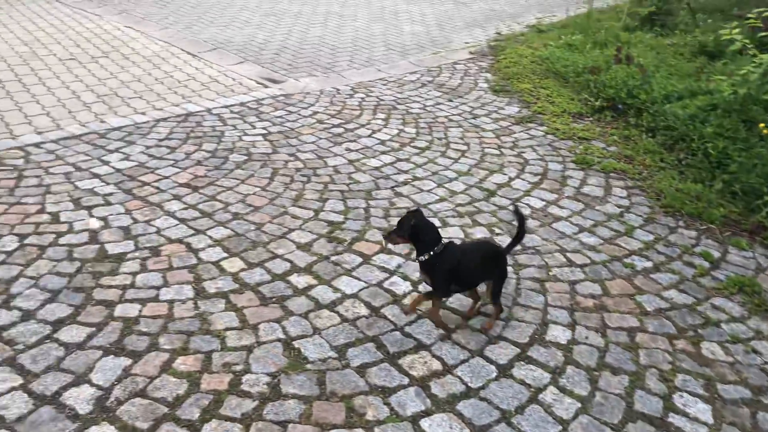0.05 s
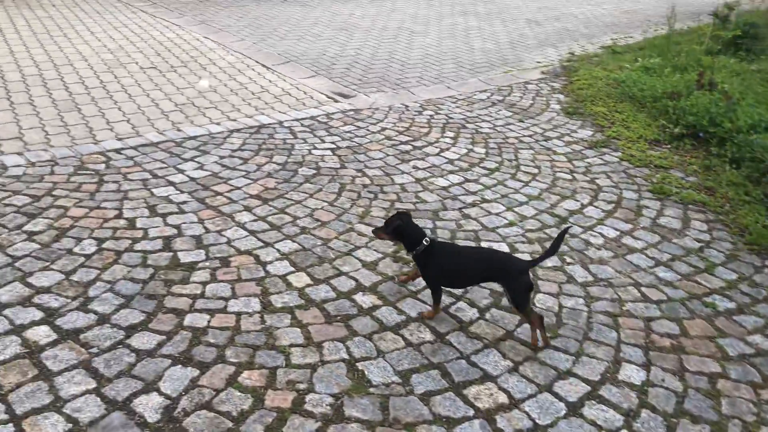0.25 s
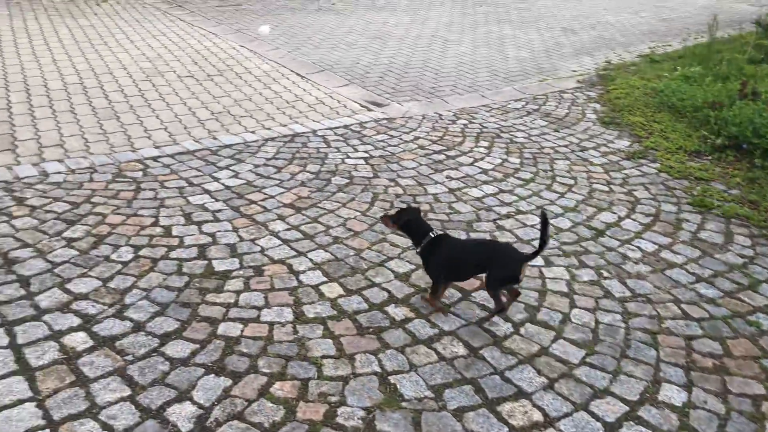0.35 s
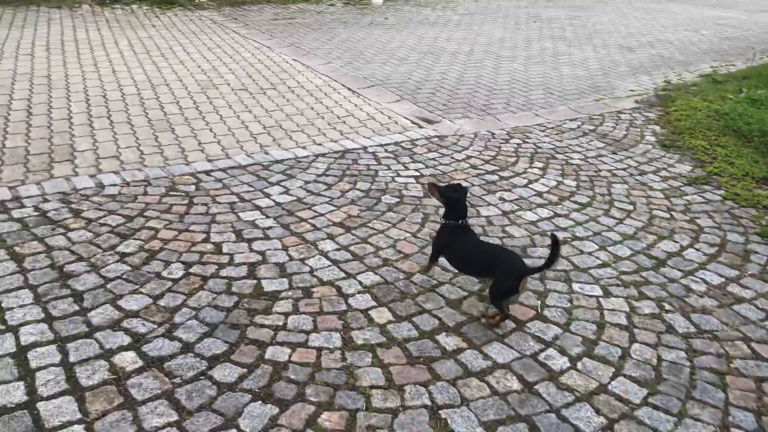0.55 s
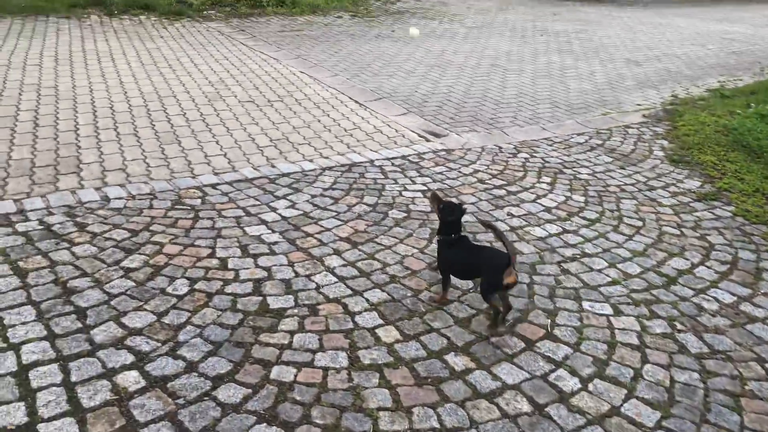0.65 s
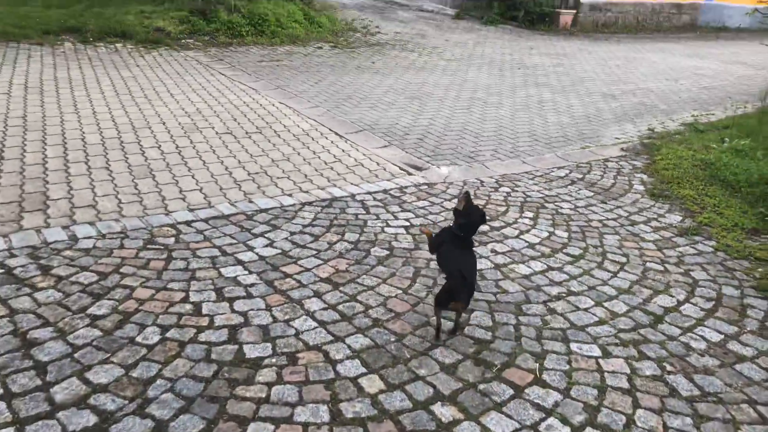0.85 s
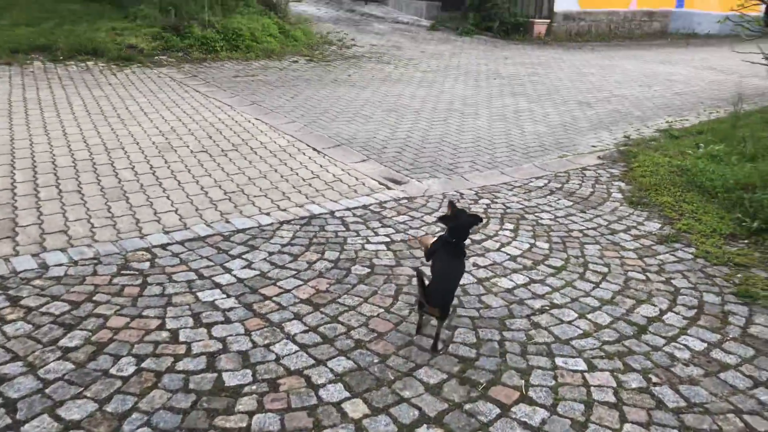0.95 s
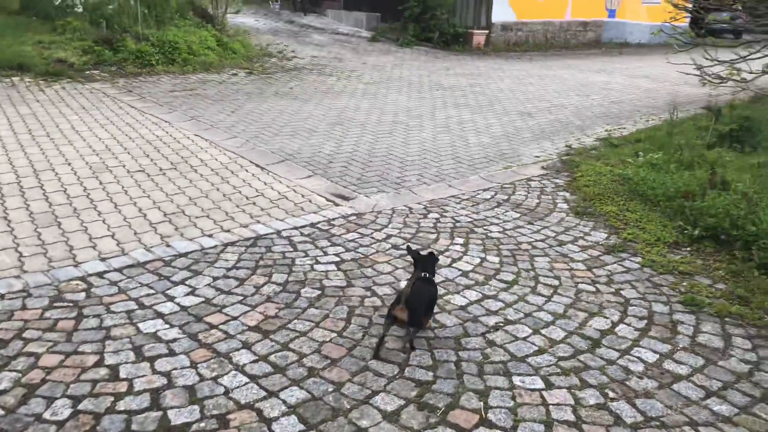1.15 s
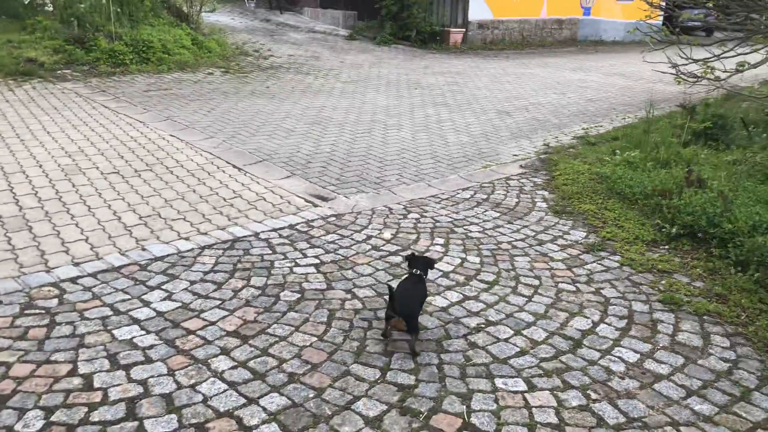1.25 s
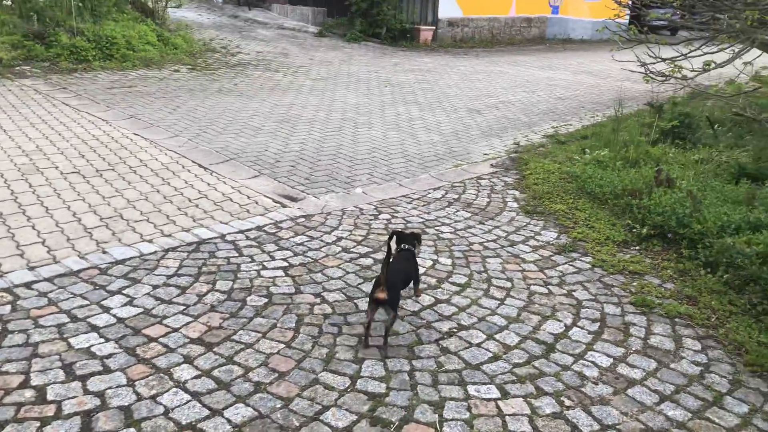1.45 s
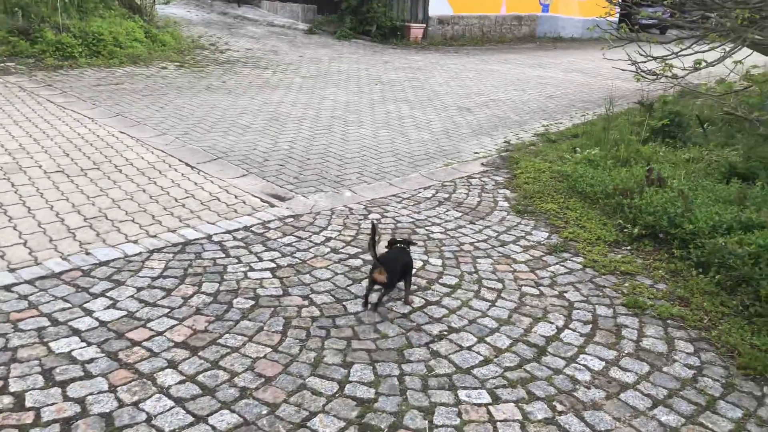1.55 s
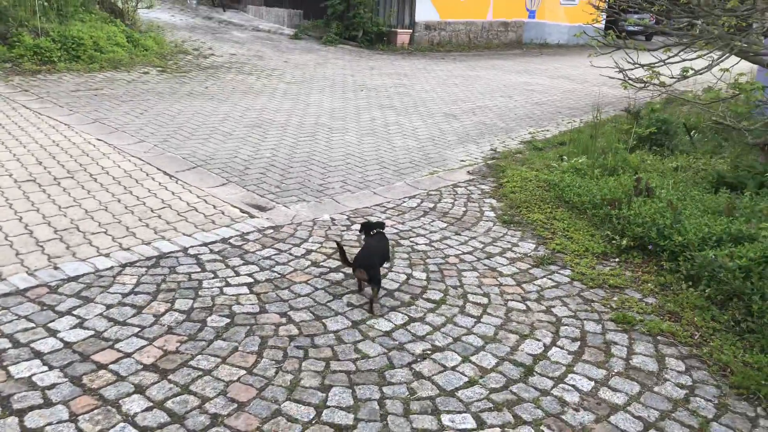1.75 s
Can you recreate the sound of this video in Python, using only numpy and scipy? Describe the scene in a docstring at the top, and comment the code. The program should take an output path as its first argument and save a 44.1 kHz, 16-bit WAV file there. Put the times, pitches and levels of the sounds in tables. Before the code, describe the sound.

A hollow ball bounces twice on stone as a small dog scampers and birds chirp faintly.

```python
"""Songbirds whistle in an open yard, over a quiet hush and the hum of a distant engine.
At 0.2 s a small hollow ball strikes the cobblestones: its shell rings and a wall returns the click.
A small dog jumps and runs after it, claws ticking, pads patting and scuffing on the stone.
At 1.3 s the ball lands again, more softly; the hum has grown a little, and the dog runs on."""
import sys
import numpy as np
from scipy import signal
from scipy.fft import rfft, irfft
from scipy.io import wavfile
from scipy.ndimage import uniform_filter1d

SR = 44100
rng = np.random.default_rng(int(sys.argv[2]) if len(sys.argv) > 2 else 0)


def file_out(sig):
    """Save sig as 16-bit WAV at sys.argv[1]."""
    # one column per channel
    cols = np.atleast_2d(sig).T
    # limit, then scale
    lim = np.clip(cols, -1, 1)
    pcm = np.round(lim * 32767).astype(np.int16)
    wavfile.write(sys.argv[1], SR, pcm)


N = 79380
SCATTER_T60_S = 0.14  # decay of sound scattered among the cobbles

# Each row: mode frequency in Hz, T60 in seconds, level in dB at the first and at the second landing.
# The levels differ because each landing meets another spot of the shell.
SHELL_MODES = [(1210, 0.0032, -33.5, -72), (2694, 0.0065, -16.5, -30.5), (3437, 0.0042, -8.5, -29),
               (3626, 0.09, -36, -48), (4190, .008, -69, -31), (4895, 0.0024, 0.5, -64),
               (6815, .011, -11, -34), (7410, 0.023, -31.5, -34.5), (8640, 0.0045, -9, -21.5),
               (9420, .008, -24, -33.5), (10330, .008, -39.5, -30), (11590, 0.0035, -1, -27),
               (12540, 0.022, -29.5, -43), (14400, 0.005, -10.5, -36)]
# Each row: start in seconds, thump level in dB, initial thump pitch in Hz,
# then the gains in dB of the wall echo and of the scatter from the paving.
LANDINGS = [(0.2053, -15.5, 2207, -19.5, -30), (1.2877, -29.5, 2970, -13.5, -14.5)]
# Each entry: delay of one landing's wall echo in seconds.
ECHO_DELAYS_S = [.032, .0285]
CONTACT_S, SHELL_RISE_S, BASS_CUT_HZ = 0.00038, 0.00055, 134  # a small ball radiates little bass
CRACK_DB, SPRAY_DB = -12.5, -26  # relative to the thump; spray is the toneless part of the scatter
WALL_HZ, YARD_HZ, YARD_DB, YARD_T60_S = 3800, 2570, -21, 0.71


def ball():
    """Impact excites the damped normal modes of a shell; paving, wall and yard reflect the click."""
    out, t = np.zeros(N), clock(0.2)
    contact = 1 - np.exp(-(t / CONTACT_S) ** 2)
    build = 1 - np.exp(-(t / SHELL_RISE_S) ** 2)
    for k, (start, thump_db, thump_hz, echo_db, scatter_db) in enumerate(LANDINGS):
        shell = sum((-1) ** m * undb(levels[k]) * np.sin(2 * np.pi * hz * t) * fade(t, t60)
                    for m, (hz, t60, *levels) in enumerate(SHELL_MODES))
        crack = undb(thump_db + CRACK_DB) * rng.standard_normal(len(t)) * fade(t, t60=0.011)
        spray = undb(thump_db + SPRAY_DB) * rng.standard_normal(len(t)) * fade(t, SCATTER_T60_S)
        body = contact * undb(thump_db) * thump(t, thump_hz, fall_s=0.0022, decay_s=0.0015)
        click = build * (shell + crack) + highpass(body, BASS_CUT_HZ)
        echo = lowpass(lowpass(click, WALL_HZ), WALL_HZ)
        add(out, start, click + build * highpass(spray, BASS_CUT_HZ))
        add(out, start, undb(scatter_db) * reverb(click, SCATTER_T60_S))
        add(out, start + ECHO_DELAYS_S[k], undb(echo_db) * echo)
    return out + undb(YARD_DB) * reverb(lowpass(out, YARD_HZ), YARD_T60_S)


# Each row: start in seconds, relative level in dB.
CLAW_STRIKES = [(0.1406, -48.5), (0.3533, -45), (0.3576, -36.5), (0.4163, -33.5), (0.452, -52),
                (0.4656, -47.5), (0.5786, -44), (0.6268, -47), (0.7194, -38), (0.755, -83), (0.8042, -44.5),
                (0.854, -48), (0.8721, -43), (0.8847, -39), (0.905, -48.5), (0.9714, -44.5),
                (1.0005, -44.5), (1.1135, -40.5), (1.191, -48.5), (1.2196, -47.5), (1.233, -44.5),
                (1.357, -53.5), (1.414, -50.5), (1.4584, -45.5), (1.5202, -44), (1.7223, -49.5),
                (1.7589, -44)]
# Each row: frequency in Hz, relative level of the tick's spectrum in dB.
CLAW_SPECTRUM = [(400, -40.5), (1500, -1.5), (3200, -6.5), (4300, -2), (5800, 0), (8200, -0.5), (12000, -4),
                 (16000, -18.5)]
CLAW_RISE_S, CLAW_T60_S, CLAW_SCATTER_DB = 0.00015, 0.013, -18


def claws():
    """A brief, hard contact has a broad spectrum: nails tick brightly and the stones scatter it."""
    envelope, t = np.zeros(N), clock(0.04)
    strike = 0.5 * fade(t, CLAW_T60_S) * (1 - np.exp(-t / CLAW_RISE_S))
    for start, db in CLAW_STRIKES:
        add(envelope, start, undb(db) * strike)
    ticks = envelope * noise(CLAW_SPECTRUM)
    return ticks + undb(CLAW_SCATTER_DB) * reverb(ticks, SCATTER_T60_S)


# Each row: start in seconds, level in dB, initial pitch in Hz.
PAD_LANDINGS = [(0.329, -55.5, 1690), (0.438, -58, 2060), (1.0985, -50, 1387), (1.529, -57, 497)]
# Each row: start in seconds, length in seconds, level in dB.
PAW_SCUFFS = [(0.729, 0.045, -59), (0.774, 0.054, -59.5), (0.88, 0.045, -60.5), (1.219, 0.025, -60),
              (1.436, 0.036, -63.5), (1.506, 0.056, -56.5), (1.55, 0.12, -59.5), (1.667, 0.049, -65.5),
              (1.737, 0.05, -56)]
# Each row: frequency in Hz, relative level of the friction spectrum in dB.
SCUFF_SPECTRUM = [(80, -6.5), (200, 2), (400, -17), (900, -3.5), (1500, -0.5), (2400, -9), (4000, -7),
                  (7000, -11.5), (15000, -31)]
SCUFF_GRAIN_DB = 6


def paws():
    """Damped impact and sliding friction: pads pat the stones and drag over grit."""
    pats, drag = np.zeros(N), np.zeros(N)
    for start, db, hz in PAD_LANDINGS:
        add(pats, start, undb(db) * thump(clock(0.03), hz, fall_s=0.0051, decay_s=0.0055))
    for start, length, db in PAW_SCUFFS:
        add(drag, start, undb(db) * np.sin(np.pi * clock(length) / length))
    grit = noise(SCUFF_SPECTRUM) * undb(SCUFF_GRAIN_DB * wander(rate_hz=510))
    return pats + drag * grit / grit.std()


# Each row: start and length in seconds, first, middle and last pitch in Hz,
# warble as a share of the pitch, direct level in dB, reverberant level in dB.
BIRD_NOTES = [(0.0, 0.031, 2024, 1902, 2110, 0.016, -62, -64),
              (0.063, 0.041, 6500, 6970, 7100, 0.017, -62.5, -72),
              (0.129, 0.054, 2847, 2994, 2965, 0.017, -67, -51.5),
              (0.148, 0.041, 5900, 5940, 5350, 0.0091, -64.5, -66),
              (0.231, 0.1, 2850, 2750, 2663, .05, -65.5, -63.5),
              (0.278, 0.056, 1993, 1843, 1680, 0.052, -60, -60),
              (0.401, 0.07, 3060, 3057, 3050, 0.0023, -51.5, -61),
              (0.427, 0.041, 2920, 2980, 2878, 0.0029, -50, -49.5),
              (0.501, 0.1243, 2086, 2053, 2081, 0.047, -59, -56),
              (0.51, 0.064, 2716, 2760, 2620, 0.038, -59, -58.5),
              (0.65, 0.05, 2950, 2959, 2984, 0.0098, -47, -59.5),
              (0.713, .03, 2976, 2960, 2920, 0.0087, -49, -55),
              (0.743, .08, 2670, 2720, 2605, 0.042, -64.5, -62),
              (0.772, 0.0815, 2062, 1978, 1983, 0.0292, -58, -62.5),
              (1.01, 0.2, 6750, 5970, 5240, 0.0046, -66.5, -71.5),
              (1.054, 0.012, 3650, 3760, 3570, 0.017, -65, -71.5),
              (1.137, 0.033, 5490, 5376, 3920, 0.03, -57, -57.5),
              (1.514, 0.026, 4470, 4100, 3620, 0.094, -58, -59.5),
              (1.533, 0.037, 1600, 1623, 1590, 0.012, -63, -64),
              (1.576, 0.068, 4330, 3753, 4300, 0.093, -65, -68.5),
              (1.691, 0.036, 3930, 4230, 4230, 0.075, -70.5, -67.5),
              (1.777, 0.025, 4060, 3880, 3900, 0.034, -56.5, -57)]
NOTE_EDGE_SHARE, WAVER_HZ, FLUTTER_DB, OVERTONE_DB = 0.085, 230, 3.5, -29


def birds():
    """Frequency and amplitude modulation make gliding whistles warble; they reverberate in the yard."""
    direct, to_yard = np.zeros(N), np.zeros(N)
    waver, flutter = wander(WAVER_HZ), undb(FLUTTER_DB * wander(WAVER_HZ))
    for start, length, first, middle, last, warble, db, yard_db in BIRD_NOTES:
        t = clock(length)
        span = (int(start * SR) + np.arange(len(t))) % N
        glide_hz = np.polyval(np.polyfit([0, 0.5, 1], [first, middle, last], 2), t / length)
        phase = 2 * np.pi * np.cumsum(glide_hz * (1 + warble * waver[span])) / SR
        ramp = np.clip(np.minimum(t, length - t) / (NOTE_EDGE_SHARE * length), 0, 1)
        envelope = np.sin(np.pi / 2 * ramp) * flutter[span]
        note = envelope * (np.sin(phase) + undb(OVERTONE_DB) * np.sin(2 * phase))
        add(direct, start, undb(db) * note)
        add(to_yard, start, undb(yard_db) * note)
    return direct + reverb(to_yard, t60=0.96)


# Each row: time in seconds, firing rate in Hz, levels of the fundamental and its octave in dB.
ENGINE_TONES = [(0.899, 88.33, -100, -74), (1.151, 91.6, -68.5, -71), (1.299, 91.5, -63, -71),
                (1.499, 92.6, -65.5, -70), (1.65, 96.5, -68, -66.5), (1.8, 94, -77, -65.5)]
FIRING_JITTER_SHARE = 0.011


def engine():
    """Periodic firing makes a harmonic series; a far motor is heard by its two lowest tones."""
    times, *columns = np.array(ENGINE_TONES).T
    hz, low_db, octave_db = (np.interp(np.arange(N) / SR, times, c) for c in columns)
    firing_hz = hz * (1 + FIRING_JITTER_SHARE * wander(rate_hz=29))
    phase = 2 * np.pi * np.cumsum(firing_hz) / SR
    return undb(low_db) * np.sin(phase) + undb(octave_db) * np.sin(2 * phase)


# Each row: frequency in Hz, relative spectral density in dB.
HUSH_SPECTRUM = [(15, -41), (25, -5), (76, 3), (170, -1.5), (463, -8), (1040, -10.5), (1650, -15),
                 (2990, -15.5), (3430, -16), (6050, -21.5), (8590, -22), (14800, -33.5), (16000, -27)]
HUSH_LEVEL_DB, HUSH_SWAY_DB = -65.5, 1


def hush():
    """Ambient noise: quiet outdoor air, strongest in the bass, swaying slightly in level."""
    return noise(HUSH_SPECTRUM) * undb(HUSH_LEVEL_DB + HUSH_SWAY_DB * wander(rate_hz=15))


def thump(t, hz, fall_s, decay_s):
    """A damped oscillation whose pitch drops quickly."""
    phase = 2 * np.pi * np.cumsum(hz / (1 + t / fall_s) ** 2) / SR
    return np.sin(phase) * np.exp(-t / decay_s)


def reverb(x, t60):
    """Reverberation: convolution with dense, decaying reflections of unit energy."""
    t = np.arange(N) / SR
    tail = rng.standard_normal(N) * fade(t, t60) * (1 - np.exp(-t / 0.001))
    return signal.fftconvolve(x, tail / np.linalg.norm(tail))[:N]


def noise(spectrum):
    """Spectral shaping: noise of rms 1 that follows (Hz, dB) points."""
    hz, db = np.array(spectrum).T
    bins_hz = np.maximum(np.fft.rfftfreq(N, 1 / SR), 1)
    gain = undb(np.interp(np.log(bins_hz), np.log(hz), db))
    x = irfft(rfft(rng.standard_normal(N)) * gain, N)
    return x / x.std()


def wander(rate_hz):
    """Moving averages smooth noise into a random drift of spread 1."""
    width = max(int(SR / rate_hz), 1)
    x = uniform_filter1d(uniform_filter1d(rng.standard_normal(N), width), width)
    return x / x.std()


def lowpass(x, hz):
    """First-order loss of treble."""
    return signal.sosfilt(signal.butter(1, hz, fs=SR, output="sos"), x)


def highpass(x, hz):
    """Second-order loss of bass."""
    return signal.sosfilt(signal.butter(2, hz, "high", fs=SR, output="sos"), x)


def fade(t, t60):
    """Exponential decay by 60 dB in t60 seconds."""
    return np.exp(-np.log(1000) * t / t60)


def undb(db):
    """Amplitude ratio of a level in decibels."""
    return 10 ** (np.asarray(db) / 20)


def clock(length):
    """Sample times over a length in seconds."""
    return np.arange(int(length * SR)) / SR


def add(out, start, x):
    """Superpose x from a start time in seconds."""
    i = max(int(start * SR), 0)
    out[i:i + len(x)] += x[:max(N - i, 0)]


def scene():
    """Superposition of ball, dog, birds and background at one microphone."""
    return (ball() + claws() + paws() + birds() + engine() + hush())[None]


def record(dry):
    """Band limiting removes the deepest rumble and the treble above 16.2 kHz."""
    treble_cut = signal.ellip(8, 0.2, 70, 16200, fs=SR, output="sos")
    return signal.sosfilt(treble_cut, highpass(dry, hz=32))


dry = scene()
out = record(dry)
file_out(out)
```